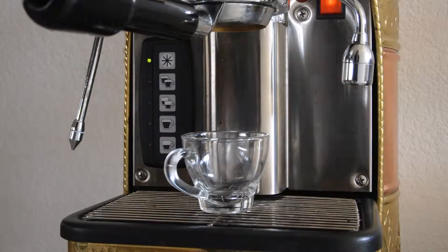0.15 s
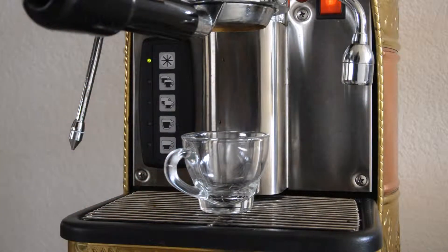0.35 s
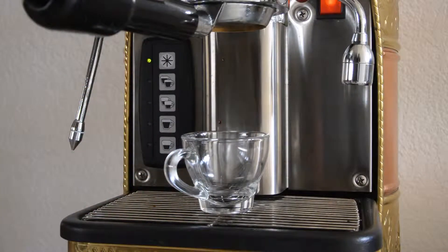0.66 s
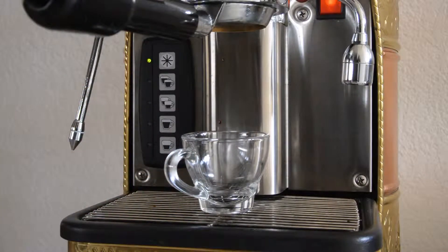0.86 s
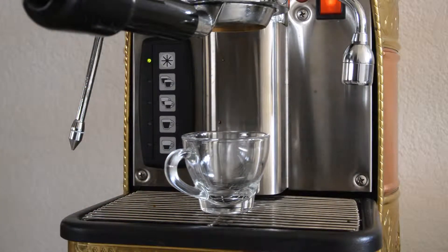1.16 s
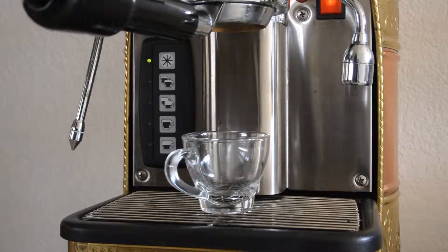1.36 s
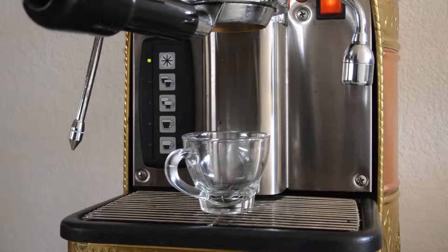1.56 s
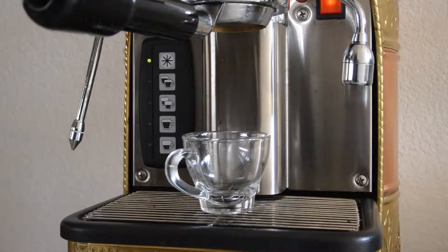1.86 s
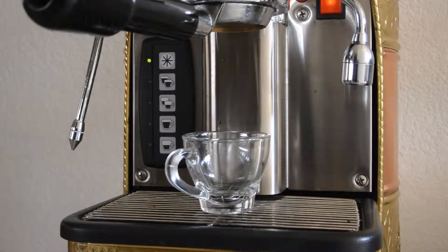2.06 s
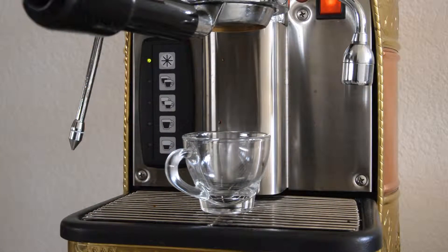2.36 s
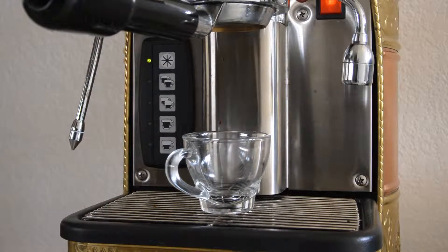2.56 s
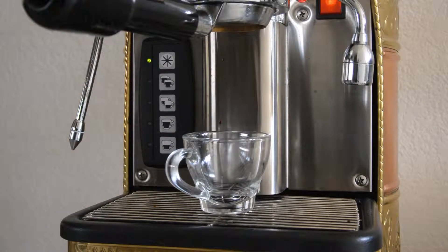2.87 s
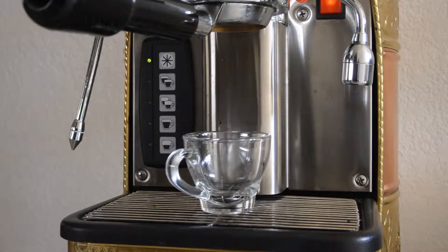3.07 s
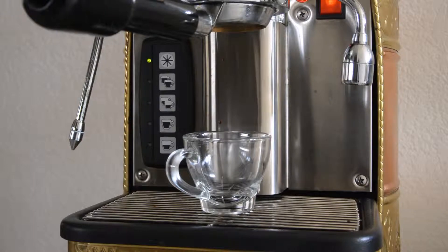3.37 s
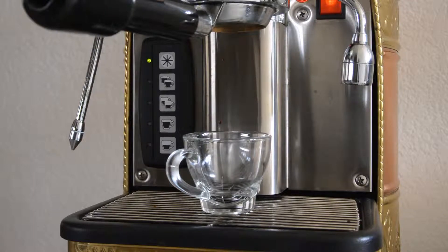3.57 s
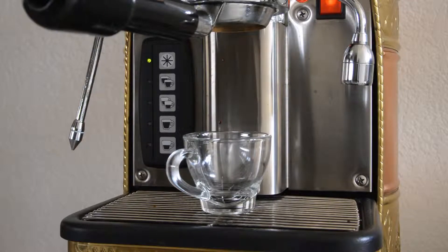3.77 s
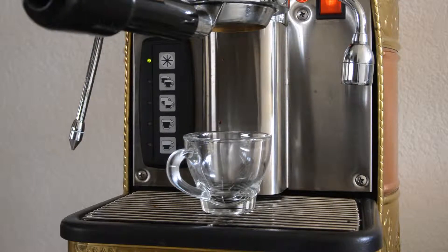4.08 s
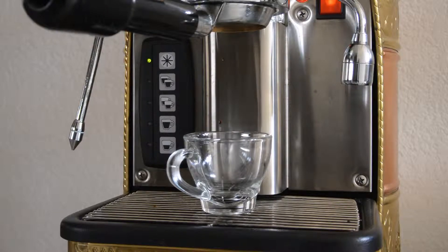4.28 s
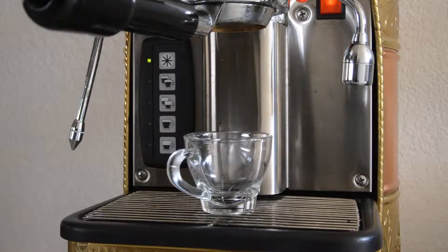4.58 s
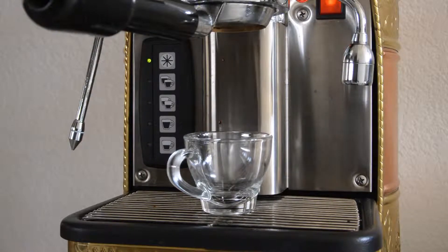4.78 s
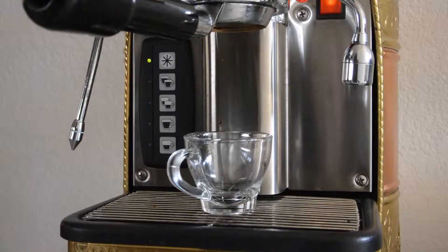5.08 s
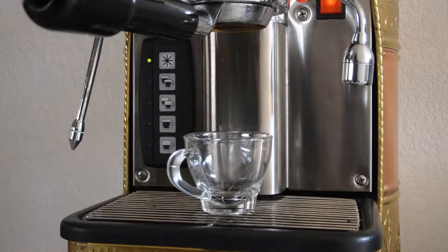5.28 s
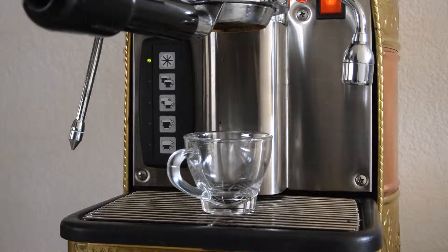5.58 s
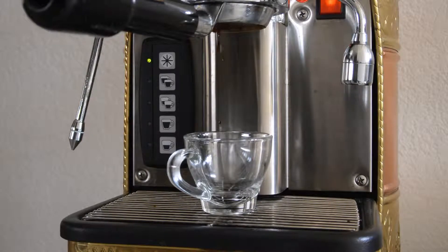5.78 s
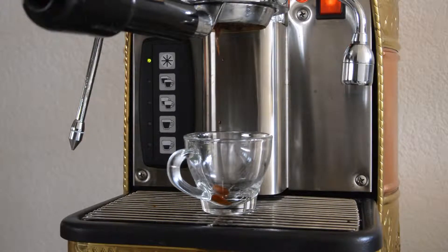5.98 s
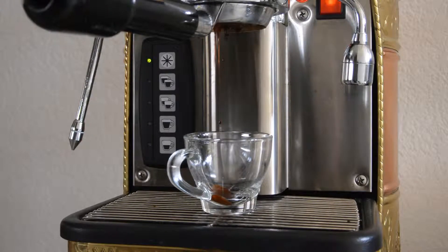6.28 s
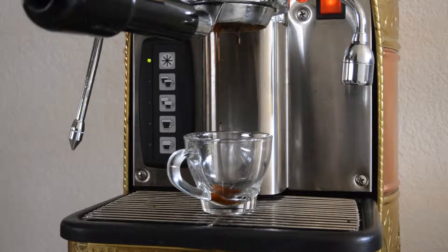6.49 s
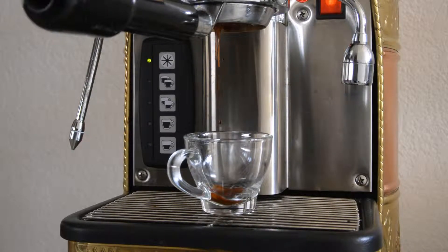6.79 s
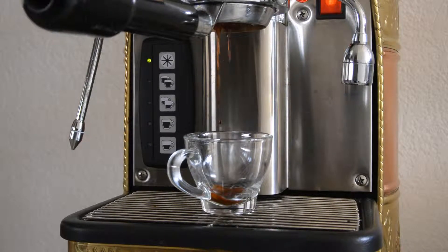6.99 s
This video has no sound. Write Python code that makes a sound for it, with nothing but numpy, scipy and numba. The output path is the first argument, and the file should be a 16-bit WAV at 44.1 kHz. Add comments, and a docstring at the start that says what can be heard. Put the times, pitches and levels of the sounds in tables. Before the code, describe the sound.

An espresso machine pump buzzes from start to finish, a steady hum vibrating its metal case, heard close to the drip tray in a small, quiet room. Water churns in the boiler beneath a light, spitting hiss. For the first 4.5 seconds, water rushes in uneven spurts through a valve that rattles and knocks lightly, making the pipes ring. From about 4.1 seconds the rush narrows into a thin hiss that rises in pitch, joined near 4.9 seconds by a high, airy whistle. The valve shuts at around 5.4 seconds and the water sounds drop away, leaving a steadier buzz with fainter whistles coming and going. Two short bursts of sharp clicks snap from the brew head at about 5.9 and 6.3 seconds, with a brief room echo. The buzz continues until the end, just after 7 seconds.

```python
"""In a small room, just in front of the drip tray, an espresso machine starts a shot.
Its pump strokes 60 times a second and makes the metal case buzz. Water churns in the boiler and
rushes in spurts through a rattling valve, which rings the pipes. As pressure builds the valve knocks,
narrows to a thin hiss and an airy whistle, and shuts. The buzz steadies, fainter whistles come and go,
and two bursts of clicks snap out."""
import sys
import numpy as np
from scipy import signal
from scipy.fft import rfft, irfft, next_fast_len
from scipy.io import wavfile
from scipy.ndimage import uniform_filter1d
from numba import njit

SR = 44100
rng = np.random.default_rng(int(sys.argv[2]) if len(sys.argv) > 2 else 0)


def generate_wav(sig):
    """Save sig (samples, or channels by samples) to the path in sys.argv[1] as 16-bit PCM at SR."""
    pcm = np.round(np.clip(np.atleast_2d(sig).T, -1, 1) * 32767).astype(np.int16)
    wavfile.write(sys.argv[1], SR, pcm)


N = 314874
T = np.arange(N) / SR
FFT_SIZE = next_fast_len(N, True)
BINS = np.fft.rfftfreq(FFT_SIZE, 1 / SR)

STROKE_HZ = 60  # the pump follows the mains
STROKE_SAMPLES = SR // STROKE_HZ
HISS_START_S, HISS_FADE_S, SHUT_S = 4.12, 4.78, 5.38  # the valve narrows, then shuts

# Tones of the buzz: multiple of the stroke rate, level/dB at no, half and full pressure
BUZZ_TONES = [(2, -70, -64, -55), (3, -64, -52, -55), (4, -40.5, -40, -39), (5, -34.5, -45, -51),
              (6, -36.8, -36.3, -39), (7, -36.5, -41, -49.5), (8, -38, -42.5, -56), (9, -47, -45, -49.5),
              (10, -54, -51, -52.5), (11, -42, -42, -44), (12, -35.7, -38, -41.5), (13, -30, -34.7, -38),
              (14, -39.5, -44, -42.5), (15, -43.5, -45, -47), (16, -44, -50.5, -44), (17, -41.5, -53, -48),
              (18, -47.5, -56.5, -54), (19, -58, -60, -60), (20, -54, -58, -60), (21, -36, -40.8, -42.5),
              (22, -41.5, -45.5, -47.5), (23, -49.5, -51, -60), (24, -45, -45.5, -58), (25, -51, -60, -51),
              (26, -48.5, -52, -61), (27, -55, -52, -51), (28, -56.5, -54, -49), (29, -46, -48, -48.5),
              (30, -51, -55, -55), (31, -57.5, -60.5, -58), (32, -57, -57, -65), (33, -52, -51, -61),
              (34, -45.5, -49, -49.5), (35, -46, -52.5, -51), (36, -54, -56.5, -62)]
# Single tones swell or sink for a while: start/s, end/s, multiple of the stroke rate, change/dB
BUZZ_SWELLS = [(-.2, .2, 11, 7), (-.2, .42, 13, -11), (.6, .92, 13, -7.5), (-.2, .1, 16, 8),
               (-.2, 1.3, 12, -4), (-.2, 1.45, 11, 4), (4.1, 4.7, 16, -5), (3.98, 4.6, 21, -4),
               (4.7, 5.3, 21, 2.5), (4.9, 5.35, 29, 5), (5.05, 5.65, 13, -3.5), (5.08, 5.66, 11, 9),
               (5.15, 6.0, 9, 6), (5.5, 6.05, 8, -10), (6.0, 6.42, 13, 3.5), (6.15, 6.45, 6, -7),
               (6.25, 6.45, 11, -9), (-.2, .5, 4, -3), (1.3, 2.2, 4, 2.5), (4.1, 4.45, 4, -3),
               (4.85, 5.7, 4, 2), (4.1, 4.4, 3, 4), (4.0, 4.4, 5, 4), (1.05, 1.35, 6, 2.5),
               (3.3, 5.05, 14, -4), (.7, 1.2, 16, -7), (1.9, 3.0, 16, 4), (.65, 1.3, 17, -6),
               (-.2, 1.4, 18, 5), (1.4, 2.6, 21, 1), (1.3, 3.0, 22, 2.5)]
# Pressure building behind the coffee: t/s, pressure (0-1), change in the buzz/dB
PUMP_LOAD = [(0, 0, 0), (1.3, 0, -.5), (2.6, 0, .7), (3.9, .1, 0), (4.3, .35, -1.5), (5.4, .55, .3),
             (5.8, .7, .7), (6.2, .95, -.5), (6.6, 1, 0), (7.14, 1, 0)]
# Spurts of water through the valve: start/s, end/s, level/dB, fade time/s
VALVE_SPURTS = [(.01, .35, -27.4, .06), (.39, .65, -26, .045), (.72, .98, -27.1, .08),
                (1.07, 1.6, -26.8, .04), (1.71, 1.95, -26, .035), (2.05, 2.88, -26.9, .025),
                (2.92, 3.03, -26.3, .04), (3.11, 3.28, -28, .08), (3.635, 3.95, -27.5, .1),
                (3.98, 4.42, -29, .24)]
# Pitches at which the pipes ring: f/Hz, width/Hz, level/dB
PIPE_RINGS = [(1780, 160, -13.5), (2090, 70, -.5), (2100, 300, -7), (2440, 170, -6.5), (2560, 62, .5),
              (2700, 150, -5), (2850, 160, -5.5), (3130, 100, -11), (3420, 160, -12), (3570, 100, -7.5),
              (3760, 100, -10.5), (3920, 50, -7), (4030, 130, -10.5), (4270, 120, -10), (4380, 60, -12),
              (4510, 65, -8), (4850, 250, -19)]
# Tone colour of the water in the boiler: f/Hz, level/dB
CHURN_SPECTRUM = [(120, -27), (200, -15.5), (310, -3.5), (400, -3), (560, -3.5), (690, -0.5), (850, -1),
                  (1100, -6.5), (1270, -1), (1480, -2.5), (1750, -3), (2300, -10.5), (4500, -20),
                  (5500, -30)]
# Knocks of the valve against the pipes: t/s, level/dB, f/Hz
VALVE_KNOCKS = [(.244, -23, 2560), (.431, -23.5, 2600), (.54, -22.5, 2090), (.567, -23.5, 2560),
                (.593, -23, 2080), (.613, -23.5, 2600), (.627, -22, 2100), (.728, -22, 2560),
                (.795, -21, 2080), (.825, -22, 2100), (.866, -22.5, 2560), (1.305, -23.5, 2580),
                (1.326, -23, 2090), (1.349, -23, 2560), (1.461, -23, 2090), (1.576, -23, 2080),
                (1.78, -23, 2060), (1.815, -23, 2060), (1.869, -19.5, 2560), (1.926, -22, 2090),
                (2.21, -23, 2600), (2.246, -20.5, 2080), (2.329, -23, 2100), (2.343, -23, 2090),
                (2.365, -22, 2090), (2.41, -23, 2600), (2.426, -22.5, 2080), (2.46, -22.5, 2090),
                (2.652, -23, 2560), (2.694, -23, 2090), (2.814, -23, 2090), (2.826, -22, 2090),
                (2.861, -22.5, 2560), (4.0303, -24, 2570), (4.0602, -20.5, 2520), (4.0991, -22, 2580),
                (4.126, -18.5, 2570), (4.2263, -23, 2770), (4.247, -23, 2550), (4.344, -19, 2560),
                (4.3655, -22.5, 2580), (4.4104, -18.5, 2480), (4.4588, -22, 2860), (4.526, -21, 2580),
                (4.575, -25, 2900)]
# Clicks of the brew head: t/s, level/dB, f/Hz, ring time/s, then, relative to that level,
# crack/dB, body/dB, snap/dB
HEAD_CLICKS = [(5.8995, -11, 2900, .0002, -11, -12, -17), (5.9245, -19.5, 2700, .0012, -11, -16, -60),
               (5.9275, -21, 3300, .0005, -9, -14, -55), (6.0455, -22.5, 3800, .0005, -6, -20, -60),
               (6.2893, -14, 2850, .0005, -7.5, -13, -24), (6.3138, -14.2, 2750, .001, -9, -17, -55),
               (6.3163, -22, 2800, .0008, -14, -18, -60), (6.3185, -21, 2500, .0013, -18, -18, -60),
               (6.3440, -17.5, 2750, .001, -22, -20, -60)]
# Thin, airy whistles as the valve narrows, fainter after it shuts: start/s, end/s, level/dB
VALVE_WHISTLES = [(4.88, 5.33, -37.5), (5.4, 5.52, -47), (5.55, 5.72, -51), (5.73, 6.08, -45),
                  (6.2, 6.29, -44), (6.86, 7.0, -55)]
# Tone colour of the spray: f/Hz, level/dB
SPRAY_SPECTRUM = [(2000, -11), (3700, -4), (4800, 0), (5300, -2.5), (5900, .5), (6400, 3), (7100, -2.5),
                  (7600, 0), (8100, -3.5), (9100, -4), (9500, -16)]
# Brief swells of spray hiss and churning, the last two around the clicks:
# start/s, end/s, boost of the spray/dB, boost of the churning/dB
BRIEF_SWELLS = [(.94, .98, 3, 0), (5.33, 5.4, 3, 4), (5.88, 5.93, 3, 3), (6.27, 6.32, 2, 2.5)]
# Tone colour of the quiet room: f/Hz, level/dB
ROOM_SPECTRUM = [(20, -12), (45, -12), (80, 0.5), (130, -0.5), (250, -6), (1000, -17), (8000, -33)]
# How unlike left and right are: f/Hz, level/dB of their unlike part (side) over their shared part (mid)
STEREO_WIDTH = [(30, -13), (100, -16), (300, -26), (600, -22.5), (1100, -11.5), (2200, -10.5), (4000, -6),
                (8000, -3.5)]


def pump_buzz(waver_db=.85, slip_rad=.095, fringe_db=-67.5, uneven_db=4, count=78):
    """Each piston stroke shakes the case through one cycle of tones; pressure shifts their balance."""
    starts = np.minimum(np.arange(N // STROKE_SAMPLES + 2) * STROKE_SAMPLES, N - 1)
    pressure, level_db = (curve[starts] for curve in curves(PUMP_LOAD))
    multiples = np.arange(count)
    # above the strong tones lies a faint, ragged fringe
    db = np.full((len(starts), count), fringe_db) + uneven_db * np.sqrt(3) * rng.uniform(-1, 1, count)
    for multiple, *levels in BUZZ_TONES:
        db[:, int(multiple)] = level_db + np.interp(pressure, [0, .5, 1], levels)
    for start, end, multiple, change_db in BUZZ_SWELLS:
        db[:, round(multiple)] += change_db * envelope(start, end, rise_s=.16, fade_s=.14)[starts]
    # a loaded piston runs steadier; high tones waver most, each drifting slowly over several strokes
    unrest = (1 - .6 * pressure[:, None]) * (multiples / 10) ** .75
    jitter = rng.standard_normal((2, len(starts), count))
    swell, drift = uniform_filter1d(jitter, size=9, axis=1) * np.sqrt(9) * unrest
    phase = piston_timing(multiples, pressure) + slip_rad * drift
    mid = undb(db + waver_db * swell) * np.exp(1j * phase) * (multiples > 1)
    side = mid * colour(STEREO_WIDTH, multiples * STROKE_HZ) * 1j * rng.choice([-1, 1], count)
    cycles = irfft(np.array([mid + side, mid - side]), STROKE_SAMPLES) * STROKE_SAMPLES / np.sqrt(2)
    fade = np.arange(STROKE_SAMPLES) / STROKE_SAMPLES  # each stroke blends into the next
    blended = cycles[:, :-1] * (1 - fade) + cycles[:, 1:] * fade
    return pan(blended.reshape(2, -1)[:, :N], left_db=-.5)


def piston_timing(multiples, pressure, spread=10.28, smear=.3, blow=.95, slam_at=.535, shove_at=.03):
    """Phase of each tone: the piston's blow plus the sheet metal's ring, spread over the cycle."""
    scatter = smear * (multiples / 10) ** 2 * rng.standard_normal(len(multiples))
    ring = np.exp(1j * (spread * multiples ** 2 / 2 + scatter))
    # a free piston slams back; a loaded one shoves the water half a cycle later
    free = ring - blow * np.exp(-2j * np.pi * multiples * slam_at)
    loaded = ring + blow * np.exp(-2j * np.pi * multiples * shove_at)
    return np.angle(free) + pressure[:, None] ** 1.4 * np.angle(loaded / free)


def valve_rush(spurt_db=-1, leak_db=-34.4, loaded_db=-15.3, flutter_db=.55, grain_db=2.2, chatter_db=1.3):
    """Tiny bubbles collapse at the valve and ring the pipes; the leak between spurts dies under load."""
    ringing = pipework() * case_ring(ring_s=.014, share=.3)
    fizz = stereo_noise(ringing, undb(grain_db * wander(1200) + chatter_db * wander(130)))
    leak = undb(leak_db + loaded_db * pump_pressure() ** 1.1)
    flow = np.hypot(undb(spurt_db) * spurts(), leak)
    return pan(even_flow(fizz, strokes=5), left_db=-.3) * flow * undb(flutter_db * wander(22))


def boiler_churn(level_db=-33, loaded_db=-8.5, shut_db=-2, grain_db=1.1, sway_db=.6):
    """Each stroke shoves water into the boiler, which rumbles less as pressure slows the flow."""
    throb = (1 + stroke_pulse(at=.45, length=.3)) * undb(grain_db * wander(150))
    _, swell_db = brief_swells()
    db = level_db + loaded_db * pump_pressure() ** 1.45 + shut_db * valve_shut()
    db += swell_db + sway_db * wander(6)
    return pan(stereo_noise(colour(CHURN_SPECTRUM), throb), left_db=-.5) * undb(db)


def valve_knocks(gain_db=-1.5, ring_s=.004, rise_s=.0015, rattle_db=1.5, rattle_chance=.6):
    """The valve rattles against the pipes on some strokes of a spurt; now and then it knocks hard."""
    out, flow = np.zeros(N), spurts()
    for hz in (2090, 2560):  # the two strongest pipe pitches
        chance, offset, energy = rng.random((N // STROKE_SAMPLES, 3)).T
        at = ((np.arange(len(offset)) + offset) * STROKE_SAMPLES).astype(int)
        taps = np.zeros(N)
        taps[at] = (chance < rattle_chance) * np.sqrt(energy) * flow[at] * undb(rattle_db)
        out += signal.fftconvolve(taps, ping(hz, ring_s, rise_s))[:N]
    for start, db, hz in VALVE_KNOCKS:
        knock = ping(hz, ring_s, rise_s)
        out[int(start * SR):][:len(knock)] += undb(db + gain_db) * knock
    return out


def valve_hiss(level_db=-29.6, shut_db=-7, open_hz=3450, shut_hz=4290, glide_mid_s=4.75, glide_s=.18,
               narrowing_hz_per_s=800, grain_db=1.6, direct_db=-17):
    """The narrowing gap hisses higher and thinner, ringing the upper pipe pitches one after another."""
    hz = open_hz + (shut_hz - open_hz) / (1 + np.exp((glide_mid_s - T) / glide_s))
    width_hz = np.clip(1400 - narrowing_hz_per_s * (T - HISS_START_S), 700, 1400)
    pass_width = width_hz * np.sqrt(2)  # two passes narrow the band again
    direct = undb(direct_db) / np.sqrt(1 + (BINS / 4560) ** 60)  # flat, then a steep cut at 4560 Hz
    jet = stereo_noise(np.hypot(pipework(above_hz=3000), direct), undb(grain_db * wander(400)))
    hiss = np.array([resonate(resonate(channel, hz, pass_width), hz, pass_width) for channel in jet])
    swell = envelope(HISS_START_S, HISS_FADE_S, rise_s=.36, fade_s=.42)
    return pan(even_flow(hiss, strokes=3), left_db=-1.5) * swell * undb(level_db + shut_db * valve_shut())


def head_clicks(gain_db=1.6, rise_s=.00015, body_hz=1450, body_s=.0006, crack_s=.0006, snap_s=.0003,
                tray_delay_s=.004, tray_db=-11):
    """The brew head clicks under pressure; the tray throws one quick echo and the room rings on."""
    direct = np.zeros(N)
    t = T[:SR // 25]
    crack_band = signal.butter(5, [900, 5100], "band", fs=SR, output="sos")
    snap_band = signal.butter(2, [4500, 9000], "band", fs=SR, output="sos")
    for start, db, hz, ring_s, crack_db, body_db, snap_db in HEAD_CLICKS:
        ring = ping(hz, ring_s, rise_s) - undb(body_db) * ping(body_hz, body_s, rise_s)
        crack = unit(signal.sosfilt(crack_band, rng.standard_normal(len(t)))) * np.exp(-t / crack_s)
        snap = unit(signal.sosfilt(snap_band, rng.standard_normal(len(t)))) * np.exp(-t / snap_s)
        click = ring + undb(crack_db) * crack + undb(snap_db) * snap
        direct[int(start * SR):][:len(t)] += undb(db + gain_db) * click
    tray_echo = undb(tray_db) * np.interp(T - tray_delay_s, T, direct)
    return direct + tray_echo + room_echo(direct)


def valve_whistle(hz=4250, half_width_hz=130):
    """Water squeezing past the narrowing valve sings in one thin, airy band, fainter after it shuts."""
    level = sum(undb(db) * envelope(start, end, rise_s=.07, fade_s=.05)
                for start, end, db in VALVE_WHISTLES)
    band = stereo_noise(1 / (1 + ((BINS - hz) / half_width_hz) ** 2))
    return pan(even_flow(band, strokes=3), left_db=-1.5) * level


def spray(level_db=-37.5, sag_db_per_s=-.5, jet_db=2.2, shut_db=-1.5, loaded_db=-3, uneven_db=1.3):
    """Water spits on each stroke over an even hiss that dries up; louder while the valve narrows."""
    steady = .55 * (1 - .45 * pump_pressure())
    drive = steady + stroke_pulse(at=.92, length=.15) * undb(uneven_db * wander(60))
    drive /= np.sqrt(uniform_filter1d(drive ** 2, SR // 2))  # even out over half a second
    narrowing = envelope(HISS_START_S, SHUT_S, rise_s=.9, fade_s=.25)
    swell_db, _ = brief_swells()
    db = level_db + sag_db_per_s * T + jet_db * narrowing + shut_db * valve_shut()
    db += loaded_db * pump_pressure() ** 2 + swell_db
    hiss = stereo_noise(colour(SPRAY_SPECTRUM) * case_ring(ring_s=.007, share=.5), drive)
    return pan(hiss, left_db=-2) * undb(db)


def room_echo(sound, level_db=-.3, decay_s=.6):
    """The walls swallow the treble and return a tail that falls 60 dB in decay_s."""
    t = T[:SR // 2]
    shape = np.exp(-np.log(1000) * t / decay_s) * (1 - np.exp(-t / .004))
    mid, side = rng.standard_normal((2, len(t))) * shape
    tail = unit(np.array([mid + .45 * side, mid - .45 * side])) / np.sqrt(len(t))
    dull = signal.sosfilt(signal.butter(3, 4500, fs=SR, output="sos"), sound)
    return undb(level_db) * signal.fftconvolve(dull[None], tail, axes=1)[:, :N]


def room_rumble(level_db=-63):
    """The faint, low noise of the room."""
    return undb(level_db) * stereo_noise(colour(ROOM_SPECTRUM))


def pump_pressure():
    """Pressure behind the coffee, 0-1."""
    pressure, _ = curves(PUMP_LOAD)
    return np.clip(pressure, 0, 1)


def stroke_pulse(at, length):
    """One fading pulse a stroke; its start and fade time are shares of the cycle."""
    return np.exp(-((STROKE_HZ * T - at) % 1) / length)


def spurts():
    """Strength of the water spurting through the valve."""
    return sum(undb(db) * envelope(start, end, rise_s=.035, fade_s=fade_s)
               for start, end, db, fade_s in VALVE_SPURTS)


def valve_shut(closing_s=.14):
    """0 while the valve is open, 1 once it has shut."""
    return np.clip((T - SHUT_S) / closing_s, 0, 1)


def brief_swells():
    """How far the spray and the churning briefly swell, in dB."""
    return sum(np.outer(boosts, envelope(start, end, rise_s=.025, fade_s=.035))
               for start, end, *boosts in BRIEF_SWELLS)


def pipework(above_hz=0):
    """Gain of the pipes, which favour their ringing pitches; only those over above_hz count."""
    return np.sqrt(sum(undb(2 * db) / (1 + ((BINS - hz) / (.8 * width)) ** 2) ** 2
                       for hz, width, db in PIPE_RINGS if hz > above_hz))


def case_ring(ring_s, share):
    """Gain of the metal case: a direct path plus a short ring at many close pitches."""
    t = T[:SR // 10]
    ring = rng.standard_normal(len(t)) * np.exp(-t / ring_s)
    return np.sqrt(1 + share * np.abs(rfft(ring, FFT_SIZE)) ** 2 / np.sum(ring ** 2))


def even_flow(x, strokes):
    """The pump doses the water, so its bursts even out over a few strokes."""
    return x / np.sqrt(uniform_filter1d(np.mean(x ** 2, axis=0), strokes * STROKE_SAMPLES))


def ping(hz, ring_s, rise_s):
    """One struck, fading tone with a peak of 1."""
    t = T[:SR // 25]
    ring = np.sin(2 * np.pi * hz * t) * np.exp(-t / ring_s) * (1 - np.exp(-t / rise_s)) ** 2
    return ring / np.abs(ring).max()


def stereo_noise(gain, drive=1):
    """Noise shaped in pitch by gain and in time by drive; left and right drift apart in the treble."""
    mid, side = rfft(rng.standard_normal((2, N)) * drive, FFT_SIZE) * gain
    side = side * colour(STEREO_WIDTH)
    return unit(irfft(np.array([mid + side, mid - side]), FFT_SIZE)[:, :N])


@njit
def resonate(x, hz, width):
    """Let through one band, whose centre and width can move every sample."""
    out, band_state, low_state = np.empty(len(x)), 0., 0.
    for i in range(len(x)):
        tuning, damping = np.tan(np.pi * hz[i] / SR), width[i] / hz[i]
        band = (band_state + tuning * (x[i] - low_state)) / (1 + tuning * (tuning + damping))
        band_state = 2 * band - band_state
        low_state += 2 * tuning * band
        out[i] = damping * band
    return out


def envelope(start, end, rise_s, fade_s):
    """Rise in a straight line from start, hold until end, then die away."""
    return np.clip((T - start) / rise_s, 0, 1) * np.exp(-np.maximum(T - end, 0) / fade_s)


def wander(rate):
    """A random curve with a spread near 1, through rate new points a second."""
    points = rng.standard_normal(int(N / SR * rate) + 2)
    return 1.2 * np.interp(T * rate, np.arange(len(points)), points)


def curves(table):
    """The columns of a table, joined by straight lines in time."""
    times, *columns = np.transpose(table)
    return [np.interp(T, times, column) for column in columns]


def colour(points, hz=BINS):
    """Gain at hz, read from a table of f/Hz, level/dB."""
    f, db = np.transpose(points)
    return undb(np.interp(np.log(hz + 1e-3), np.log(f), db))


def pan(x, left_db):
    """Tilt a sound to the left; a negative left_db tilts it right."""
    return x * undb(np.array([[left_db], [-left_db]]) / 2)


def low_pass(x, hz):
    """Cut steeply above hz."""
    return signal.sosfilt(signal.ellip(8, .2, 70, hz, fs=SR, output="sos"), x)


def undb(db):
    """Turn decibels into a gain."""
    return 10 ** (np.asarray(db) / 20)


def unit(x):
    """Scale to an average (rms) level of 1."""
    return x / np.sqrt(np.mean(x ** 2))


def scene():
    """Pump and water over the quiet room; only the clicks reach the highest treble."""
    water = boiler_churn() + valve_rush() + valve_knocks() + valve_hiss() + valve_whistle() + spray()
    return low_pass(pump_buzz() + water + room_rumble(), hz=9500) + head_clicks()


def record(dry):
    """Cut the very top of the treble."""
    return low_pass(dry, hz=15500)


dry = scene()
out = record(dry)
generate_wav(out)
```